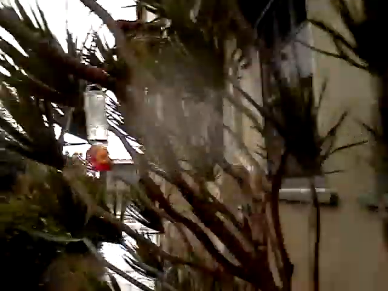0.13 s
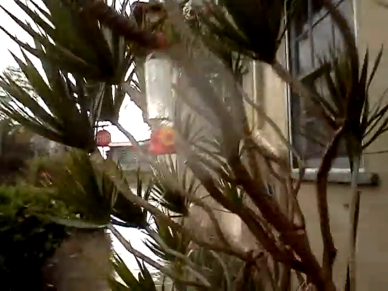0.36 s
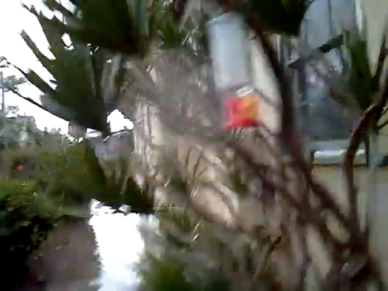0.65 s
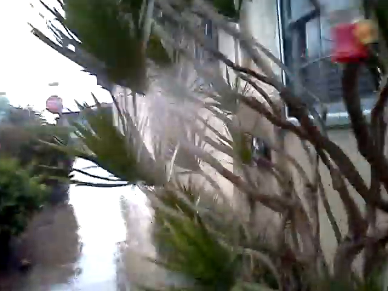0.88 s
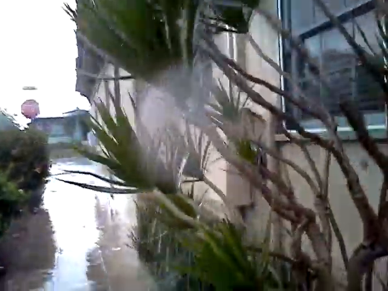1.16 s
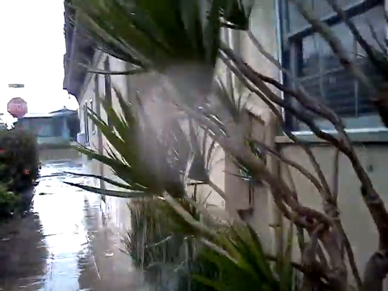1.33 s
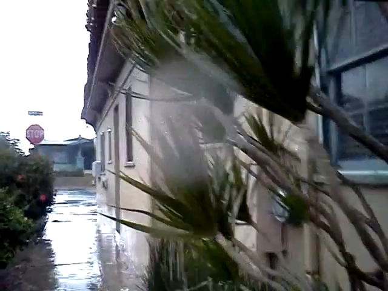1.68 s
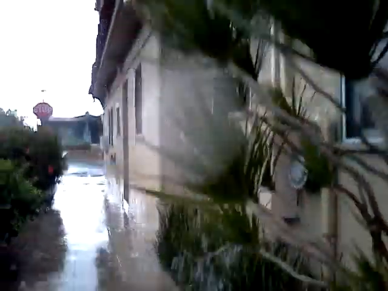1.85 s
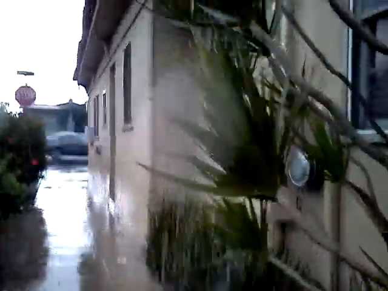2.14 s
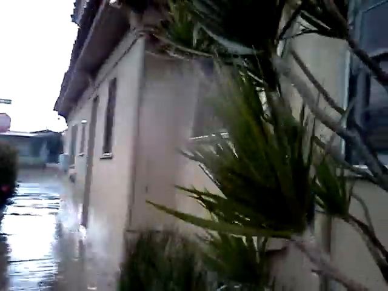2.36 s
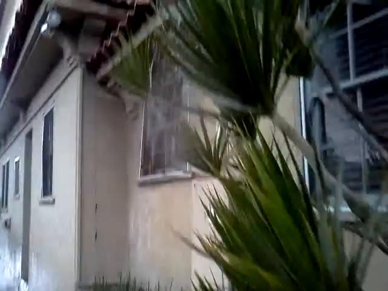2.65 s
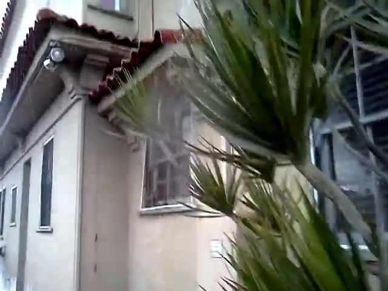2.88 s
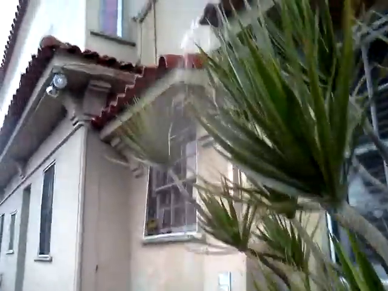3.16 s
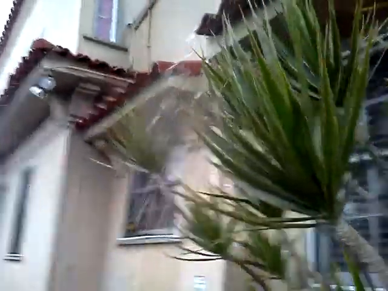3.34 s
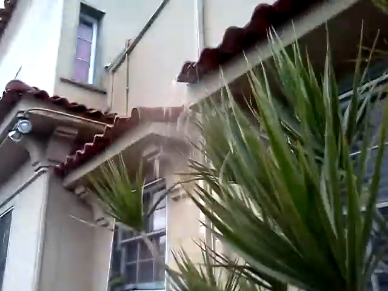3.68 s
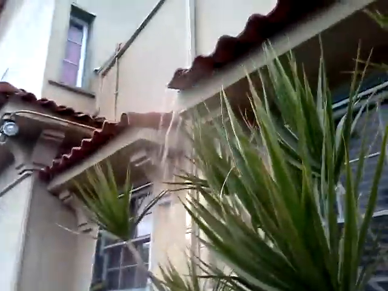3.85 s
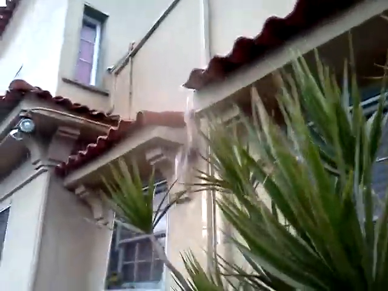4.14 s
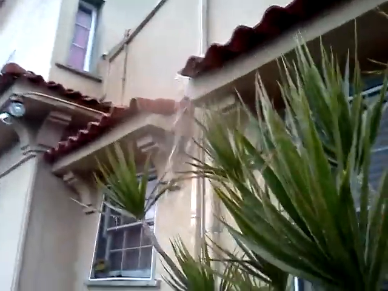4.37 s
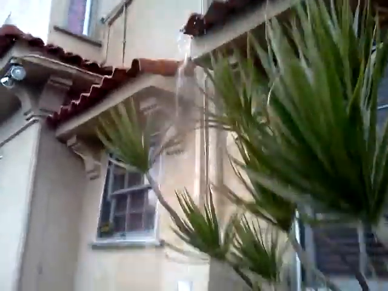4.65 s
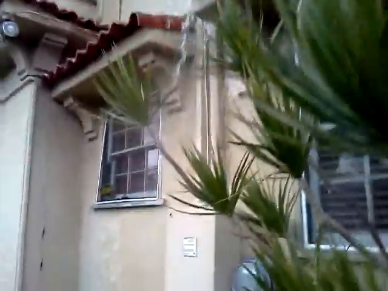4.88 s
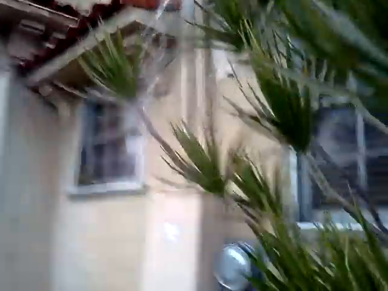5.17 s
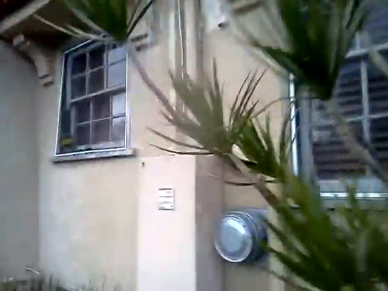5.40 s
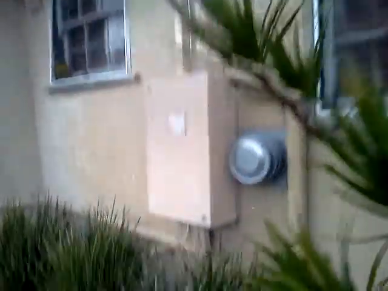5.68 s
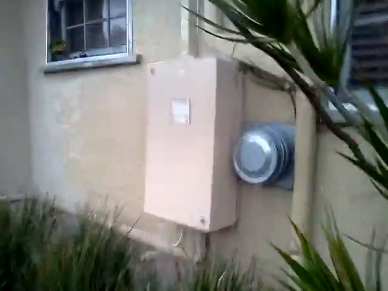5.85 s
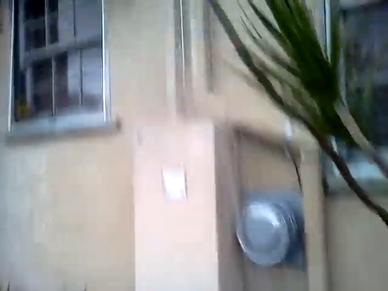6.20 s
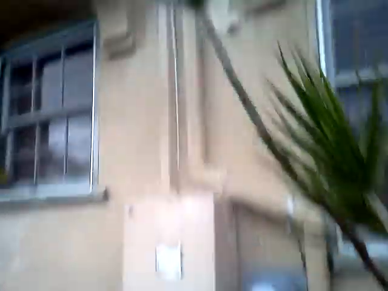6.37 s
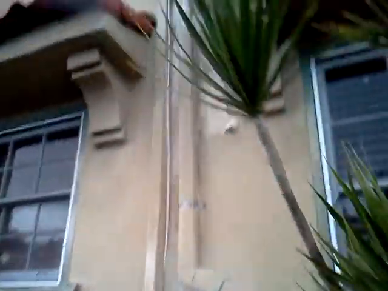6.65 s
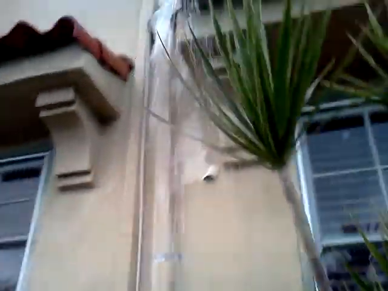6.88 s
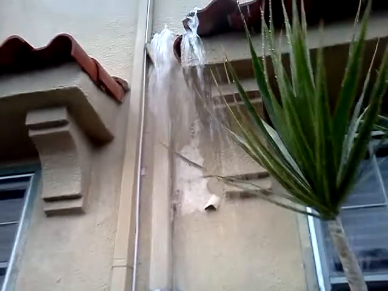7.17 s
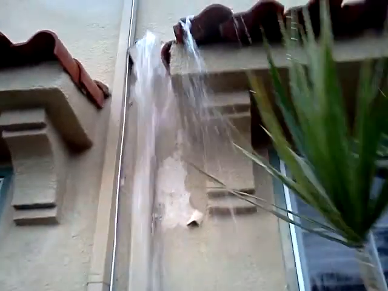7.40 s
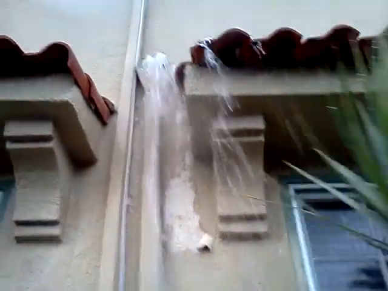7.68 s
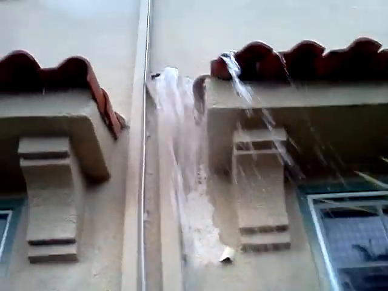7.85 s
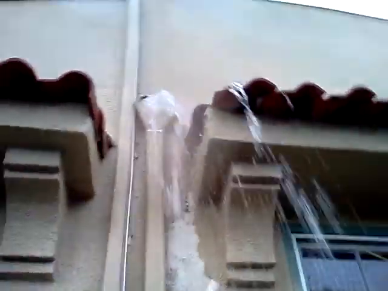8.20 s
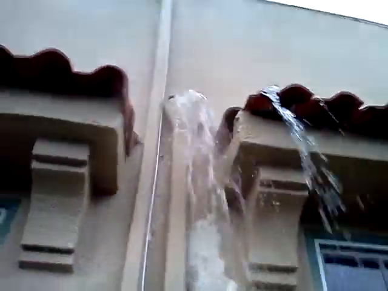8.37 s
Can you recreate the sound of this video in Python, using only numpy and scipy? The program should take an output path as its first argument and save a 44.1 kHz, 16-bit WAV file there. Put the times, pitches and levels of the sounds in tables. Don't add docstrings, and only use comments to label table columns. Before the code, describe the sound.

A heavy downpour outside a house, heard through a narrow, telephone-band handheld microphone. From 0 s dense rain patters on leaves and paving, grainy and hissing, with a few bright single drops and a loud tick near 0.6 s. Wind starts buffeting around 0.7 s; from 1.3 to 1.8 s a hard gust flutters and slaps the microphone in rapid low thuds. Around 2 s it calms, the distant rumble sinks and a short wash of street spray swells. From about 2.4 s roof water lands nearby, with clustered crackling splashes and overloaded snaps strongest from 3 to 5 s, amid lighter gusts. Wind thumps return at 5.7-6.2 s, with fat drops bursting. From 6.3 to 8.5 s rain continues with scattered splashes, a cluster of sharp drops near 6.9 s, brief wind knocks and thin clipping clicks.

```python
import sys
import numpy as np
from scipy import signal
from scipy.fft import rfft, irfft
from scipy.io import wavfile
from scipy.ndimage import uniform_filter1d

SR = 44100
rng = np.random.default_rng(int(sys.argv[2]) if len(sys.argv) > 2 else 0)


def volts_from_decibels(level):
    exponent = np.asarray(level, float) / 20
    return 10 ** exponent


def pcm_store(signal):
    levels = np.round(np.clip(np.atleast_2d(signal), -1, 1) * 32767)
    wavfile.write(sys.argv[1], SR, levels.astype(np.int16).T)


N = 376173


def rms_one(x):
    return x / np.sqrt(np.mean(x ** 2) + 1e-20)


def in_time(rows):
    s, *columns = np.transpose(rows)
    return [np.interp(np.arange(N) / SR, s, c) for c in columns]


def at_hz(points, hz):
    point_hz, point_db = np.transpose(points)
    return np.interp(np.log(hz), np.log(point_hz), point_db)


def between(low_hz, high_hz, share):
    return low_hz * (high_hz / low_hz) ** share


def drift(rate_hz):
    pole = np.exp(-80 * np.pi * rate_hz / SR)
    noise = rng.standard_normal(N // 40 + 2002)
    slow = signal.lfilter([1], [1, -2 * pole, pole * pole], noise)[2000:]
    rounded = 2 * np.tanh(rms_one(slow) / 2)
    return np.interp(np.arange(N) / 40, np.arange(len(slow)), rounded)


def ring(x, hz, cycles):
    radius, angle = volts_from_decibels(-60 * hz / (cycles * SR)), 2 * np.pi * hz / SR
    return signal.lfilter([1, 0, -1], [1, -2 * radius * np.cos(angle), radius * radius], x + 1e-18)


def coloured(spectrum):
    hz = np.maximum(np.fft.rfftfreq(N, 1 / SR), 1)
    return rms_one(irfft(rfft(rng.standard_normal(N)) * volts_from_decibels(at_hz(spectrum, hz)), N))


def add_ring(out, s, height, hz, rise_s):
    t = np.arange(round(8 * rise_s * SR)) / SR
    envelope = height * t / rise_s * np.exp(1 - t / rise_s)
    at = max(round((s - rise_s) * SR), 0)
    out[at:at + len(t)] += (envelope * np.cos(2 * np.pi * hz * (t - rise_s)))[:N - at]


# pitch_hz [Hz], level_db [dB per Hz]
RAIN_SPECTRUM = [(24, -55.5), (40, -12.5), (482, -31), (1180, -23), (3190, 13), (3500, 18), (4550, -40.5),
                 (7700, -120)]


def patter(low_hz, high_hz, per_s, spread_db, cycles, hiss_db, patchy_db, together_db):
    sizes = volts_from_decibels(spread_db * np.minimum(rng.exponential(1, N), 4)) * rng.choice([-1, 1], N)
    born = rng.random(N) < per_s * volts_from_decibels(together_db) / SR
    dealt = rng.integers(0, 6, N)
    far = rng.standard_normal((2, N))
    out = np.zeros(N)
    for k, hz in enumerate(np.geomspace(low_hz, high_hz, 6)):
        near = rms_one(ring(sizes * born * (dealt == k), hz, cycles))
        hiss = volts_from_decibels(hiss_db + patchy_db * drift(19.4)) * rms_one(ring(far[k % 2], hz, cycles))
        out += volts_from_decibels(at_hz(RAIN_SPECTRUM, hz)) * np.sqrt(hz) * (near + hiss)
    return rms_one(out)


# start_s [s], nearness_db [dB], turn_to_spout_db [dB]
DOWNPOUR = [(0.0, -26.5, 2), (0.31, -24, 1.3), (0.88, -19.5, -2.5), (1.21, -20.5, -0.5), (1.65, -22, -1),
            (2.1, -26, 0), (2.5, -26.5, -1), (3.18, -27, 5), (3.92, -26, 1.5), (4.9, -27.5, 4),
            (5.1, -24, 0.5), (5.56, -22.5, 1.6), (5.95, -22.5, 3), (6.25, -19.5, 2), (6.5, -23, 3),
            (6.9, -22, 4), (7.55, -27.5, 2.5), (8.53, -27.5, 2)]


def rain():
    near_db, turn_db = in_time(DOWNPOUR)
    leaf_db, spray_db = near_db - turn_db, near_db + turn_db
    car_s, car_pass_s, car_rise_db = 2.05, 0.24, 7
    car_db = car_rise_db * np.exp(-((np.arange(N) / SR - car_s) / car_pass_s) ** 2)
    puddle_db = -31.5 + near_db - near_db.mean() + car_db
    bunches_db = 4.0 * drift(12) + 4.0 * drift(35)
    puddles = patter(510, 1177, 1300, 2.3, 11.0, 1.6, 5.3, bunches_db)
    leaves = patter(1550, 2063, 1200, 2.6, 6.3, 0.6, 8.0, bunches_db)
    spray = patter(2430, 4200, 1500, 2.6, 11.6, 0.83, 6.3, bunches_db)
    roar = rms_one(signal.sosfilt(signal.butter(3, 520, fs=SR, output="sos"), coloured(RAIN_SPECTRUM)))
    out = volts_from_decibels(puddle_db - 5.5) * puddles
    out += volts_from_decibels(leaf_db - 1.0) * leaves
    out += volts_from_decibels(spray_db + 1.0) * spray
    return out + volts_from_decibels(-37.5 + 0.6 * drift(27)) * roar


SPLASH_LEAD_S = 0.0016
# start_s [s], level_db [peak dB], pitch_hz [Hz]
SPLASHES = [(2.4561, -6.5, 2203), (3.1754, -6, 2576), (3.233, -7, 3320), (3.2578, -4.5, 3210),
            (3.5744, -2, 2490), (3.9751, -9, 2810), (4.3539, -1.5, 3330), (4.4445, -6.5, 3470),
            (4.7601, -6.5, 3380), (5.6305, -2, 2060), (6.5589, -1.5, 2990), (7.807, -2, 3560),
            (8.4998, -7, 3140), (2.346, -8, 2760), (2.6064, -7, 2880), (2.9015, -10, 3130),
            (2.9215, -8, 2370), (2.956, -10, 2220), (3.3071, -8, 2165), (3.92, -3, 3300),
            (6.5138, -8.5, 2980), (6.8037, -5, 2860), (7.2791, -8, 3070), (7.463, -8.5, 2710),
            (7.6167, -5.5, 2880), (7.848, -9, 3430), (7.9465, -10, 2410), (8.049, -6, 2610),
            (8.1737, -11, 2030), (8.4648, -5, 3080)]
# burst_s [s], level_db [peak dB], pitch_hz [Hz], crack_db [dB above 6 kHz]
TORRENTS = [(2.8034, -6.5, 2354, -33.5), (3.0735, 13.5, 2595, -23.5), (3.145, -0.5, 3420, -29.5),
            (3.335, 2, 3080, -27.5), (3.6842, 5.5, 3420, -25), (3.7777, 8, 3280, -25),
            (4.0164, 3, 2530, -46), (4.397, 9, 3344, -20), (4.5533, 1, 3230, -35.5),
            (4.714, 8.5, 3420, -13.5), (4.8057, 1, 3250, -26.5), (4.8288, 1.5, 3090, -32.5),
            (4.9292, 7, 3340, -40), (5.4347, -2.5, 2830, -42.5), (5.4551, -3, 2660, -34),
            (5.857, -1.5, 2373, -30), (6.228, -1.5, 3240, -15.5), (6.744, 6, 2570, -40),
            (7.3705, -1, 3300, -27.5), (7.43, -3, 2625, -36.5), (8.3007, 0, 2674, -14)]


def landings():
    return SPLASHES + [(s - SPLASH_LEAD_S, peak_db, hz) for s, peak_db, hz, _ in TORRENTS]


def splashes():
    size = 4000
    out = np.zeros(N + size)
    decay = volts_from_decibels(-60 * np.arange(size) / SR / 0.05)
    for s, peak_db, hz in landings():
        pick, sign = rng.random((2, size))
        crackle = (sign - 0.5) * (pick < 3200 / SR) * decay
        sound = ring(crackle, hz, 7.1) + 0.94 * ring(crackle, 2300, 5.1) + 0.1 * ring(crackle, 1800, 1.8)
        at = round(s * SR)
        out[at:at + size] += volts_from_decibels(peak_db - 4.0) * sound / np.abs(sound).max()
    return out[:N]


def lesser_drops(count=20):
    fallback_s, fallback_db = 0.014, -9
    low_hz, high_hz = 2060, 3400
    stray_db, stray_spread_db, stray_from_s = -10.5, 3.5, 2.3
    rows = [(s + SPLASH_LEAD_S, fallback_db + 3.5 + 0.58 * peak_db, hz) for s, peak_db, hz in SPLASHES]
    for s, peak_db, hz in landings():
        first, second, pitch = rng.random(3)
        level_db = fallback_db + 0.6 * min(peak_db, 0)
        rows.append((s + fallback_s * (0.3 + 0.3 * first), level_db, hz))
        rows.append((s + fallback_s * (0.6 + 0.4 * second), level_db - 4.5, between(low_hz, high_hz, pitch)))
    for k in range(count):
        place, size, pitch = rng.random(3)
        s = stray_from_s + (N / SR - stray_from_s) * (k + place) / (count + 1)
        level_db = stray_db + stray_spread_db * (size - 0.5)
        rows.append((s, level_db, between(low_hz, high_hz, np.sqrt(pitch))))
    return rows


# peak_s [s], level_db [peak dB], pitch_hz [Hz]
DROPS = [(0.1415, -5, 3240), (0.3194, -7, 2060), (0.4833, -7.5, 3010), (0.798, -4.5, 2110),
         (0.9323, -6, 2220), (1.162, -6, 2950), (1.519, 0, 2490), (2.7184, -7, 2630), (3.057, 0, 3400),
         (3.206, -9.5, 3360), (3.5103, -3.5, 3290), (3.5895, -4, 2490), (3.708, -11.5, 3020),
         (3.756, -6.5, 3180), (3.885, -3.5, 3480), (3.9314, -6, 1735), (4.28, -7, 2950),
         (4.4125, -2.5, 2010), (4.4748, -3.5, 2680), (4.7354, -1, 3600), (4.7816, -7.5, 3440),
         (5.0897, -6, 3110), (5.269, -5, 3390), (6.3016, -2.5, 3450), (6.337, -5.5, 3010),
         (6.6305, -3, 3500), (6.7118, -4, 3320), (7.1392, -5.5, 2980), (7.192, -8.5, 2330),
         (8.3392, -7.5, 2980)]


def drops():
    out = np.zeros(N)
    for s, peak_db, hz in DROPS + lesser_drops():
        add_ring(out, s, volts_from_decibels(peak_db - 1.0), hz, 0.0006)
        add_ring(out, s, volts_from_decibels(peak_db - 10.0), 0.71 * hz, 0.0004)
    return out


# peak_s [s], crack_db [dB above 6 kHz], pitch_hz [Hz]
FAT_DROPS = [(0.6298, -31.5, 3080), (3.078, -22.5, 2100), (3.0866, -31.5, 2570), (3.0901, -43.5, 1920),
             (3.2661, -23, 3340), (3.28, -30.5, 3160), (3.5249, -33.5, 3230), (3.687, -45.5, 2730),
             (3.717, -36.5, 2380), (3.7213, -31, 2240), (3.7812, -26, 2975), (4.3998, -26, 1926),
             (5.5048, -45, 3220), (5.6513, -18.5, 3420), (5.861, -38, 2245), (5.9574, -20.5, 3160),
             (6.029, -32, 2737), (6.2885, -61.5, 2690), (6.5667, -30.5, 3210), (6.6703, -42.5, 2840),
             (6.92, -33.5, 3110), (6.924, -28, 3146), (6.9397, -29.5, 3150), (6.9458, -35, 2550),
             (7.0126, -29.5, 3060), (7.0166, -44, 2760), (7.826, -51.5, 3020), (8.524, -29, 2810)]


def fat_drops():
    out = np.zeros(N)
    torrent_bursts = [(s, crack_db, hz) for s, _, hz, crack_db in TORRENTS]
    for s, crack_db, hz in FAT_DROPS + torrent_bursts:
        add_ring(out, s, 0.63 + 1.63 * volts_from_decibels(crack_db * 0.6), hz, 0.0005)
    return out


# start_s [s], hold_s [s], buffeting_db [dB], flutter_db [dB]
GUSTS = [(0.044, 0.64, -44, -33.5), (0.679, 0.21, -21.5, -30), (1.08, 0.14, -28, -29),
         (1.24, .03, -18, -25), (1.338, 0.25, -14, -11.5), (1.619, .13, -20.5, -19),
         (1.786, 0.011, -17, -29), (3.509, 0.17, -24.5, -30.5), (3.973, 0.28, -30.5, -34.5),
         (4.117, 0.2, -26, -33), (4.398, 0.0086, -20.5, -31.5), (4.656, .25, -29.5, -37),
         (5.047, 0.064, -27.5, -34), (5.307, 0.023, -23.5, -35), (5.499, 0.014, -18, -30),
         (5.6, 0.067, -30.5, -32), (5.722, .05, -21.5, -31.5), (5.81, 0.19, -17, -24),
         (5.989, 0.15, -16, -25), (6.332, 0.15, -21, -34), (6.642, .01, -26.5, -38),
         (6.813, 0.062, -18.5, -25.5), (6.919, 0.089, -28.5, -29.5), (7.16, 0.013, -25.5, -33),
         (7.531, .01, -30, -39), (7.68, .003, -20, -24), (7.762, 0.026, -26.5, -40),
         (7.876, .04, -33.5, -44), (8.023, .04, -22.5, -38), (8.146, .1, -28, -38),
         (8.34, 0.085, -40, -36.5)]


def gust_levels():
    rise_db_per_s, fall_db_per_s = 349.5, 300
    calm_db, calm_flutter_db = -57, -37
    t = np.arange(0, N / SR + 0.002, 0.002)
    start, hold, buffet_db, flutter_db = np.transpose(GUSTS)[:, :, None]
    loss_db = rise_db_per_s * np.maximum(start - t, 0) + fall_db_per_s * np.maximum(t - start - hold, 0)
    buffet = np.maximum((buffet_db - loss_db).max(axis=0), calm_db)
    flutter = np.maximum((flutter_db - loss_db).max(axis=0), calm_flutter_db)
    return in_time(np.transpose([t, buffet, flutter]))


# pitch_hz [Hz], level_db [dB per Hz]
BUFFET_SPECTRUM = [(15, -64), (25, -36), (64, -13.5), (140, -17), (259, -0.5), (335, -3.5), (583, -12),
                   (647, -30), (900, -22), (1170, -64), (1980, -120)]


def wind():
    buffet_db, flutter_db = gust_levels()
    lumps_db = 5.64 * drift(33)
    low = volts_from_decibels(buffet_db + lumps_db - 4.0) * coloured(BUFFET_SPECTRUM)
    band = signal.butter(2, [430, 820], "band", fs=SR, output="sos")
    flutter = rms_one(signal.sosfilt(band, rng.standard_normal(N)))
    return low + volts_from_decibels(flutter_db + lumps_db - 7.0) * flutter


def eddy_run(count=15):
    start_s, spacing_s, first_db, last_db = 1.356, 0.0168, -8, -4.5
    rows = []
    for k in range(count):
        late, size, pitch = rng.random(3)
        s = start_s + spacing_s * (k + 0.5 * (late - 0.5))
        level_db = first_db + (last_db - first_db) * k / count + 3.2 * (size - 0.5)
        rows.append((s, level_db, between(280, 480, pitch)))
    return rows


# start_s [s], level_db [peak dB], pitch_hz [Hz]
THUMPS = [(0.843, -13.5, 298), (0.884, -16, 280), (1.236, -12, 368), (1.321, 4, 309), (1.416, -0.5, 500),
          (1.658, -5, 268.5), (1.488, 0.5, 370), (1.592, 0, 474), (1.72, -3, 470), (1.739, -4.5, 284),
          (1.795, -13.5, 268), (4.066, -12, 311), (4.15, -11.5, 296), (4.183, -13, 365),
          (4.252, -18.5, 463), (4.317, -11.5, 312), (4.394, -8.5, 336), (5.315, -14.5, 270),
          (5.497, -13, 234), (5.727, -13.5, 216), (5.762, -10.5, 262), (5.814, 0.5, 330),
          (5.887, -9.5, 324), (5.982, -10.5, 270), (6.357, -9.5, 349), (7.679, -3.5, 291), (7.76, -17, 352),
          (1.467, -2, 318), (1.51, -4.5, 477), (1.571, -4, 337)]


def thumps():
    out = np.zeros(N)
    for s, peak_db, hz in THUMPS + eddy_run():
        add_ring(out, s + 0.004, volts_from_decibels(peak_db - 3.5), hz, 0.004)
    return out


# pitch_hz [Hz], level_db [dB per Hz]
RUMBLE_SPECTRUM = [(15, -44), (25, -11.5), (81, -2.5), (310, -9.5), (400, -6.5), (520, -27.5), (880, -120)]


def rumble():
    lull_s, lull_half_s, lull_depth_db = 2.5, 0.81, -11
    lull_db = lull_depth_db * np.exp(-((np.arange(N) / SR - lull_s) / lull_half_s) ** 4)
    return volts_from_decibels(-44.5 + lull_db + 6.2 * drift(3.7)) * coloured(RUMBLE_SPECTRUM)


def scene():
    near = splashes() + drops()
    lag = round(0.0035 * SR)
    echo = np.concatenate([np.zeros(lag), near[:-lag]])
    thin = signal.butter(2, 260, "high", fs=SR, output="sos")
    steady = signal.sosfilt(thin, rain() + near + volts_from_decibels(-13.0) * echo) + wind()
    steady = steady / (1 + (steady / 0.55) ** 4) ** 0.25
    bursts = fat_drops()
    steady = steady / (1 + 2.5 * uniform_filter1d(np.abs(bursts), size=40))
    return (steady + bursts + thumps() + rumble())[None]


def low_pass(x):
    return signal.sosfilt(signal.butter(12, 15950, fs=SR, output="sos"), x)


# pitch_hz [Hz], level_db [dB]
CONVERTER = [(3350, 1.5), (3600, -2.5), (4000, -16), (4400, -28.5), (4620, -47), (4720, -100)]


def record(dry):
    phone_rate_hz, full_scale = 8000, 0.715
    hz, half = np.fft.rfftfreq(N, 1 / SR), round(phone_rate_hz / 2 * N / SR)
    phone = irfft(rfft(dry[0])[:half + 1], 2 * half) * 2 * half / N
    low = rfft(np.clip(phone, -full_scale * 0.92, full_scale * 0.92)) * N / (2 * half)
    low = low * hz[:half + 1] / np.hypot(hz[:half + 1], 60.0)
    spectrum = np.zeros(len(hz), complex)
    spectrum[:2 * half + 1] = np.concatenate([low, np.conj(low[-2::-1])])
    smoothing = volts_from_decibels(np.interp(hz, *np.transpose(CONVERTER))) * (hz < 4750)
    wide = irfft(spectrum * smoothing, N)
    mix = np.clip(wide, -full_scale, full_scale)[None]
    return low_pass(mix)


dry = scene()
out = record(dry)
pcm_store(out)
```